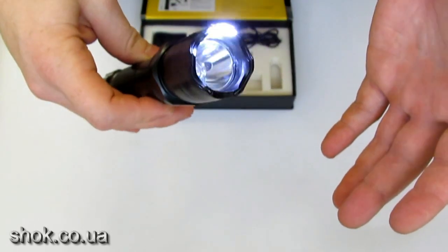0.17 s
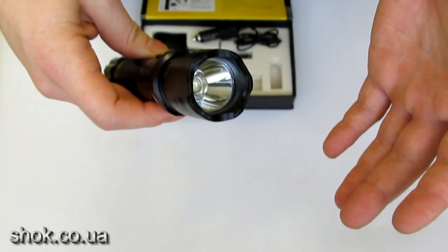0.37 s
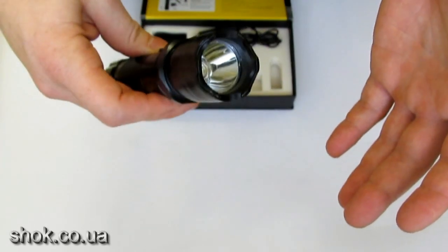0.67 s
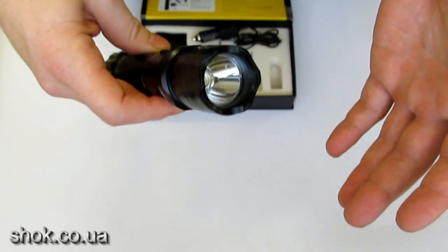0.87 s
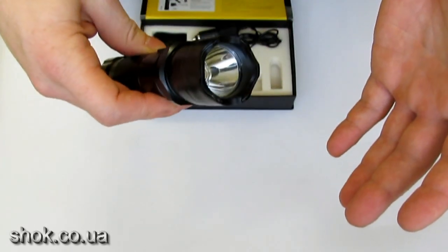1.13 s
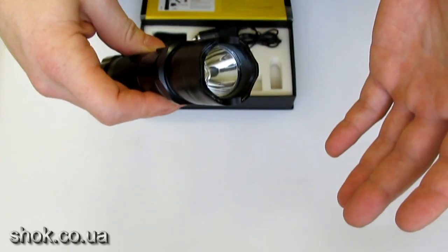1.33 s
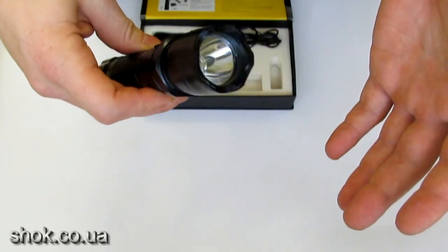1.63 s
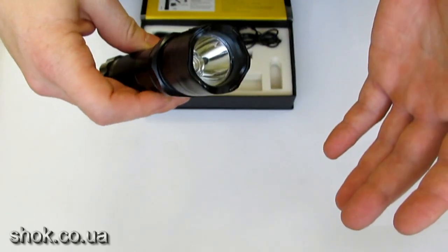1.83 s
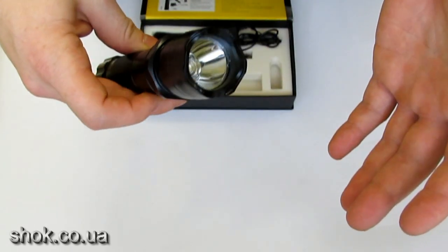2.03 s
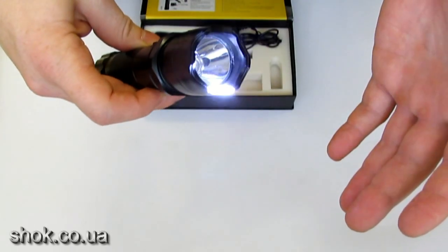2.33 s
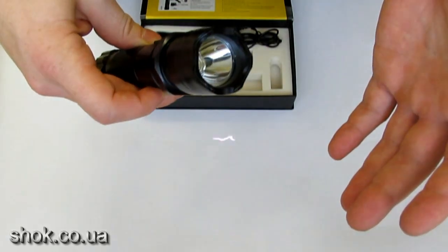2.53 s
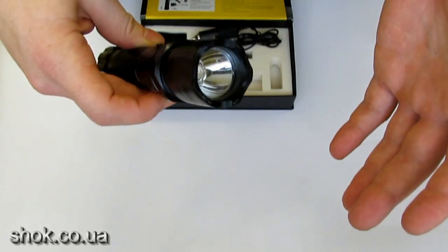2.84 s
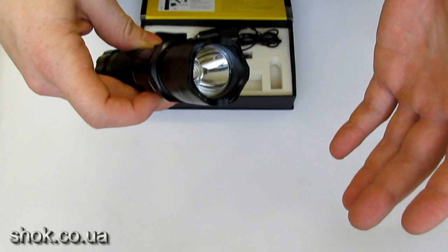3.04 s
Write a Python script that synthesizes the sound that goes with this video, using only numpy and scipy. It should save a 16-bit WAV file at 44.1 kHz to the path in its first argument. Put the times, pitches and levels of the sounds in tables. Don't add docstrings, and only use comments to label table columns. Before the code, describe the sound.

Stun device sparks in loud buzzing, rattling volleys, ringing briefly in a small hard room

```python
import sys
import numpy as np
from scipy import signal
from scipy.fft import rfft, irfft
from scipy.io import wavfile
from scipy.ndimage import uniform_filter1d, minimum_filter1d

SR = 44100
rng = np.random.default_rng(int(sys.argv[2]) if len(sys.argv) > 2 else 0)


def materialize(psi):
    bounded = np.clip(np.atleast_2d(psi).T, -1, 1)
    quanta = np.round(bounded * 32767).astype(np.int16)
    wavfile.write(sys.argv[1], SR, quanta)


def invert_db(x):
    u = np.asarray(x, float) / 20
    return 10 ** u


N = 141120
LEAD = SR // 4


def evened(x):
    return x / np.sqrt(np.mean(x ** 2) + 1e-20)


def read(points, hz):
    f, value = np.transpose(points)
    return np.interp(np.log(hz + 1), np.log(f + 1), value)


def coloured(x, points):
    hz = np.fft.rfftfreq(x.shape[-1], 1 / SR)
    return irfft(rfft(x) * invert_db(read(points, hz)), x.shape[-1])


def add(mix, s, sound):
    part = mix[:, round(s * SR) + LEAD:][:, :sound.shape[1]]
    part += sound[:, :part.shape[1]]


def room_tone():
    # f/Hz, level/dB
    tone_colour = [(50, -25), (150, -9), (300, -7.5), (620, -3.5), (950, -6), (4000, -14), (15000, -36)]
    level_db, low_hz = -78.5, 105
    noise = rng.standard_normal((3, N))
    no_rumble = signal.butter(4, low_hz, "high", fs=SR, output="sos")
    tone = signal.sosfilt(no_rumble, noise[:2] + 1.7 * noise[2])
    return invert_db(level_db) * evened(coloured(tone, tone_colour))


def echo():
    # f/Hz, t/s
    ring_times = [(200, 0.12), (800, 0.24), (1600, 0.3), (3200, .33), (6400, 0.27), (9000, 0.25),
                  (14000, 0.17)]
    # f/Hz, likeness (0 to 1)
    likeness = [(200, 1), (700, 0.92), (1400, 0.44), (6000, 0.073)]
    early_db, early_s = -24, 0.0042
    late_db, late_stretch = -21.5, 1.47
    n = SR // 2
    hz, t, (a, b) = signal.stft(rng.standard_normal((2, n)), SR, nperseg=128)
    same = np.clip(read(likeness, hz), 0, 1)[:, None]
    z = np.array([a, same * a + np.sqrt(1 - same ** 2) * b])
    fall_db = -60 * t / read(ring_times, hz)[:, None]
    fade_out = np.cos(np.pi * t.clip(0, .5))
    z *= invert_db(fall_db) + invert_db(late_db + fall_db / late_stretch) * fade_out
    tail = signal.istft(z, SR, nperseg=128)[1][:, :n]
    return tail * (1 + invert_db(early_db) * np.exp(-np.arange(n) / SR / early_s))


def button(db):
    # f/Hz, level/dB
    click_colour = [(290, -58.5), (500, -31), (3370, -7), (4800, -13), (8990, -5), (11400, -2),
                    (15000, -41.5)]
    click_s, room_db = 0.0024, -42.5
    t = np.arange(SR // 2) / SR
    tick = rng.standard_normal(len(t)) * np.exp(-t / click_s)
    tick = tick + invert_db(room_db) * echo()
    return invert_db(db + 4.5) * coloured(tick, click_colour)[:, :SR // 4]


def knock():
    level_db, pitch_hz, decay_s = -16.5, 824, 0.0031
    t = np.arange(SR // 30) / SR
    swell = t / decay_s * np.exp(-t / decay_s)
    return invert_db(level_db) * np.sin(2 * np.pi * pitch_hz * t) * swell * np.ones((2, 1))


def microphone_sag(t):
    level_db, swing_hz, decay_s, rise_s = -43.5, 31, .019, .0015
    shared = 2.5 * rng.standard_normal()
    size = shared + rng.standard_normal((2, 1))
    sag = np.cos(2 * np.pi * swing_hz * t) * (np.exp(-t / decay_s) - np.exp(-t / rise_s)) * size
    return sag * invert_db(level_db) * np.cos(np.pi / 2 * t / t[-1])


def kicks(left_db, right_db):
    kick_s, stray_leak_s, rise_s = .0004, .00045, .00005
    rebound_s = .0015
    stray, stray_s = .6, .004
    soon_s, late_s = .0008, .0023
    low_hz = 130
    rattle_db, rattle_s, rattle_hz = -2, 0.0059, (575, 2930)
    right_is_hard = right_db > -8.5
    t = np.arange(SR // 5) / SR
    short_t = t[:SR // 50]

    at = rng.uniform(0, 2.5 * stray_s, (2, 16))
    size = stray * rng.standard_normal((2, 16)) * np.exp(-at / stray_s)
    at[:, 0] = np.array([soon_s, soon_s if right_is_hard else late_s]) + at[:, 0] / 20
    at[:, 1] = at[:, 0] + rebound_s * np.array([rng.uniform(0.61, 1.2), 1])
    size[:, :2] = 1, -1
    size[1, 2:] /= 2 if right_is_hard else 1

    age = np.maximum(short_t - at[..., None], 0)
    leak_s = np.r_[kick_s, kick_s, np.full(14, stray_leak_s)][:, None]
    shape = np.exp(-age / leak_s) - np.exp(-age / rise_s)
    jumps = (size[..., None] * shape).sum(1)
    jumps = signal.lfilter(*signal.butter(1, low_hz, "high", fs=SR), jumps)
    rattle = rng.standard_normal(jumps.shape) * np.exp(-short_t / rattle_s)
    jumps += invert_db(rattle_db) * signal.lfilter(*signal.butter(2, rattle_hz, "band", fs=SR), rattle)
    strength = np.sqrt((jumps ** 2).sum(1, keepdims=True) / 30)
    jumps *= invert_db(np.array([[left_db], [right_db]])) / strength

    sound = microphone_sag(t)
    sound[:, :SR // 50] += jumps
    return sound


def spark(db, first, usual):
    # f/Hz, level/dB
    spark_colour = [(120, -68), (250, -24), (1200, -17), (3800, -5.5), (8000, -0.5), (11000, 3.5),
                    (14000, -1.5), (16500, -13.5)]
    level_db, first_db, crack_s = -15.5, -2, 0.0018
    steady = .55
    n = SR // 2
    room = steady * usual + np.sqrt(1 - steady ** 2) * echo()
    sound = coloured(np.pad(room, ((0, 0), (0, 400))), spark_colour)[:, :n]
    crack = 1 + first * invert_db(first_db) * np.exp(-np.arange(n) / SR / crack_s)
    return invert_db(level_db + db) * crack * sound / np.sqrt(np.mean(sound[:, :1500] ** 2))


def scene():
    # t/s, level/dB
    earlier_sparks = [
        (-.21, 3.5),
        (-.175, -10.5),
        (-.14, 0),
    ]
    # t/s, left kick level/dB, right kick level/dB
    short_bursts = [(0.2052, -21, -10), (0.2407, -8.5, -18), (0.2772, -7, -18.5), (0.3111, -11.5, -15.5),
                    (0.3446, -12.5, -12), (0.65, -3, -9), (0.6879, -11.5, -12), (0.723, -13.5, -15.5),
                    (0.7569, -9.5, -16), (0.7918, -5, -17.5), (0.8289, -12.5, -14.4), (1.046, -10, -9),
                    (1.0812, -9.5, -10), (1.1145, -13.5, -14), (1.1487, -14, -16.5), (1.1862, -10, -9),
                    (1.493, -11, -9.5), (1.526, -11.5, -15.0), (1.5623, -19, -10), (1.6012, -10, -13.5),
                    (1.635, -21, -6), (1.668, -18, -8), (1.7013, -14, -11.5)]
    # t/s, left kick level/dB, right kick level/dB
    long_burst = [(2.2051, -7, -8.5), (2.2409, -18, -9), (2.2752, -12, -10.5), (2.3107, -21.5, -9),
                  (2.3439, -25.5, -11), (2.3789, -21.5, -10), (2.413, -12, -9.5), (2.4462, -11, -9.5),
                  (2.4818, -13, -11.5), (2.5149, -19.5, -8), (2.5482, -17.5, -3.5), (2.5828, -12, -8.5),
                  (2.6168, -12.5, -2), (2.6522, -19, -7), (2.6904, -11, -3.5), (2.7236, -9.5, -3.5),
                  (2.7631, -12, -13.5), (2.797, -16.5, -10.5), (2.8305, -15.5, -9), (2.8654, -23, -8.5)]
    # t/s, level/dB
    clicks = [
        (0.63, -50),
        (1.027, -51.5),
        (1.462, -43.5),
    ]
    spread_db = 0.5
    mix = np.zeros((2, N + LEAD))
    usual = echo()
    for s, db in earlier_sparks:
        add(mix, s, spark(db, False, usual))
    last = 0
    for s, left_db, right_db in list(short_bursts) + list(long_burst):
        first = s - last > 1 / 10
        add(mix, s, spark(spread_db * rng.standard_normal(), first, usual))
        add(mix, s, kicks(left_db, right_db))
        if first:
            add(mix, s, knock())
        last = s
    for s, db in clicks:
        add(mix, s, button(db))
    return mix[:, LEAD:] + room_tone()


def holes(x):
    weak_db, depth_db = -4.1, -40
    low_hz, high_hz = 2300, 5800
    top_hz = (13600, 15000)
    hz, _, z = signal.stft(x, SR, nperseg=2048)
    power = uniform_filter1d((abs(z) ** 2).mean(0), size=3, axis=1)
    power = uniform_filter1d(power, size=2, axis=0)
    around = uniform_filter1d(power, size=30, axis=0)
    kept = 1. * (power > invert_db(2 * weak_db) * around)
    kept = minimum_filter1d(minimum_filter1d(kept, size=3, axis=0), size=2, axis=1)
    weak = (kept == 0) & ((hz > low_hz) & (hz < high_hz))[:, None]
    edge = np.repeat(rng.uniform(*top_hz, z.shape[2]), 2)[:z.shape[2]]
    weak |= hz[:, None] > edge
    level = (abs(z) ** 2).sum((0, 1))
    weak &= np.roll(level, 2) > level / 10
    return signal.istft(z * np.where(weak, invert_db(depth_db), 1), SR, nperseg=2048)[1][:, :N]


def smear(x):
    starts = [
        .180,
        .643,
        1.038,
        1.482,
        2.179,
    ]
    level_db, decay_s = -20.5, 0.018
    t = np.arange(SR // 35) / SR
    noise = rng.standard_normal((2, len(t))) * np.exp(-t / decay_s)
    noise = noise / np.linalg.norm(noise[0])
    ahead = signal.fftconvolve(x[:, ::-1], noise, axes=1)[:, :N][:, ::-1]
    now = np.arange(N) / SR - np.array(starts)[:, None]
    gate = uniform_filter1d(((now > 0) & (now < 1 / 30)).sum(0) * 1., size=80)
    return invert_db(level_db) * gate * ahead


def roll_off(x):
    return signal.sosfilt(signal.butter(12, 15500, fs=SR, output="sos"), x)


def record(dry):
    ceiling, edge_hz = 0.68, 15000
    x = ceiling * np.tanh(dry / ceiling)
    x = signal.sosfiltfilt(signal.butter(8, edge_hz, fs=SR, output="sos"), x)
    return roll_off(holes(x) + smear(x))


dry = scene()
out = record(dry)
materialize(out)
```